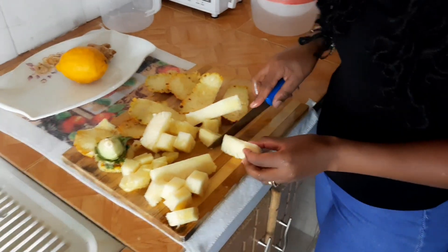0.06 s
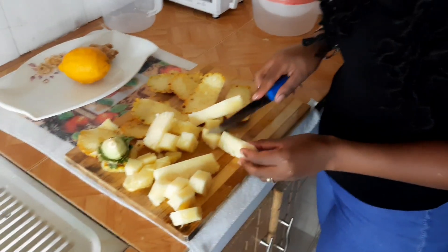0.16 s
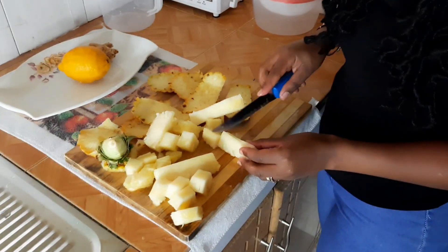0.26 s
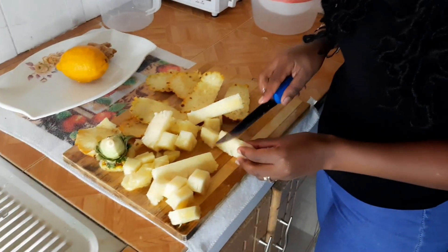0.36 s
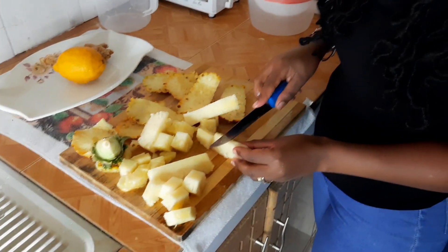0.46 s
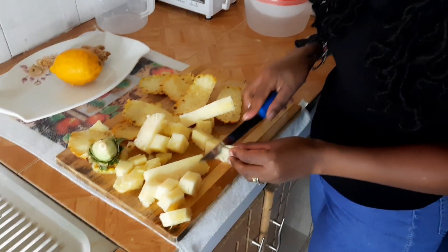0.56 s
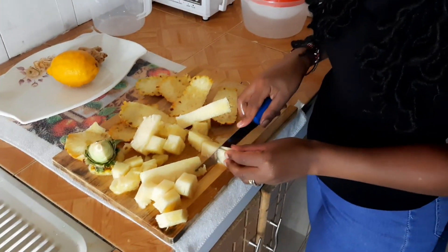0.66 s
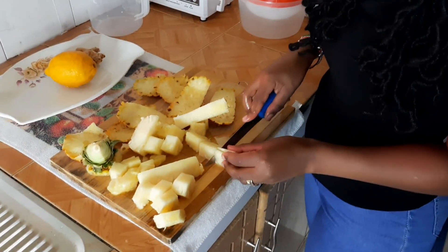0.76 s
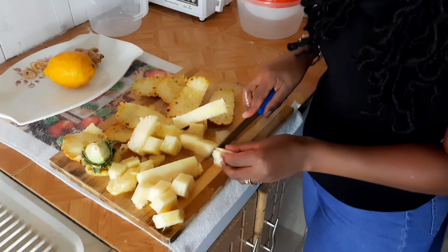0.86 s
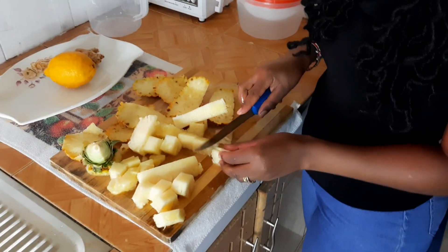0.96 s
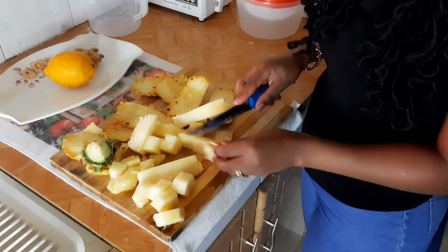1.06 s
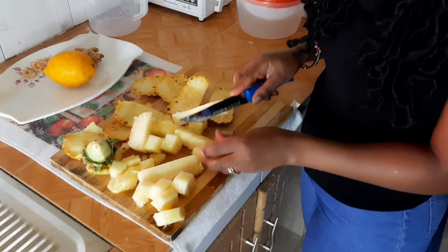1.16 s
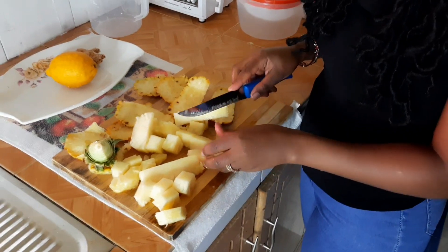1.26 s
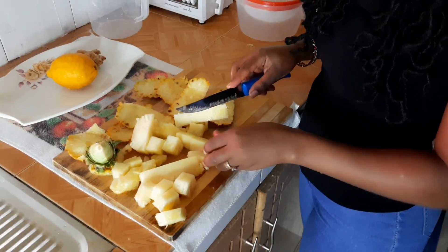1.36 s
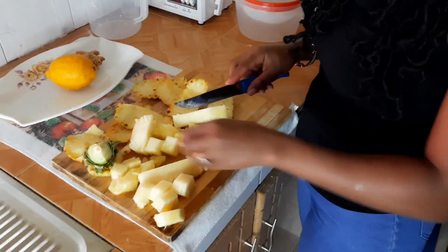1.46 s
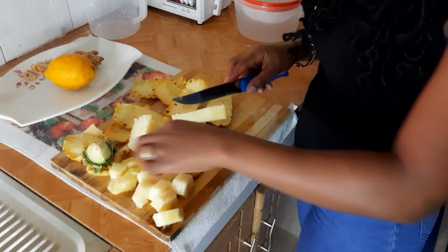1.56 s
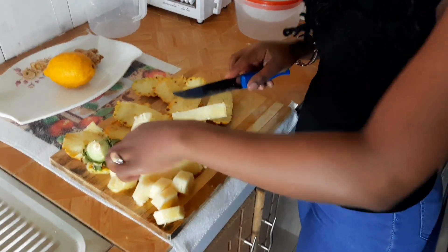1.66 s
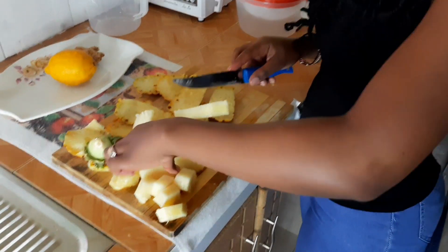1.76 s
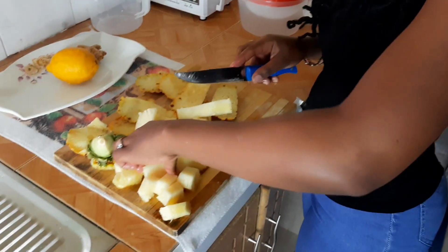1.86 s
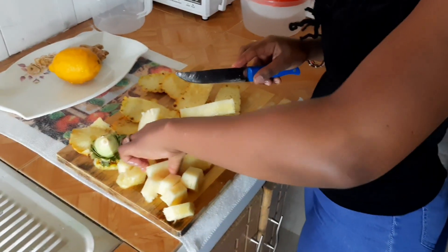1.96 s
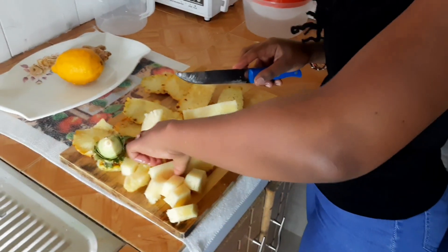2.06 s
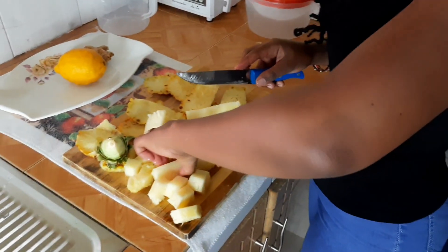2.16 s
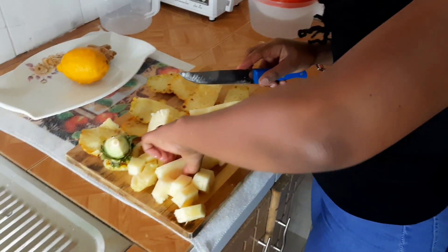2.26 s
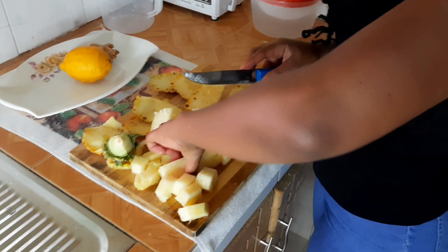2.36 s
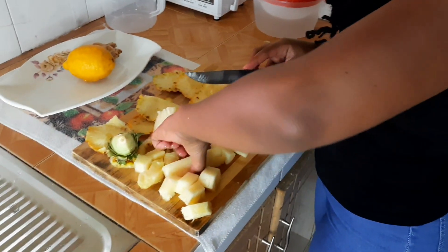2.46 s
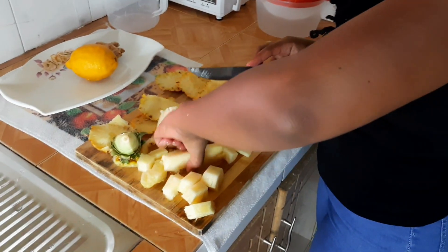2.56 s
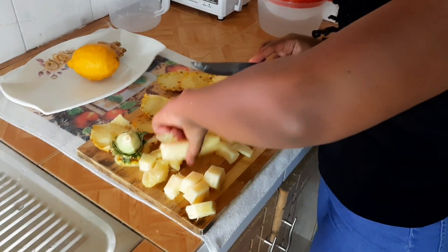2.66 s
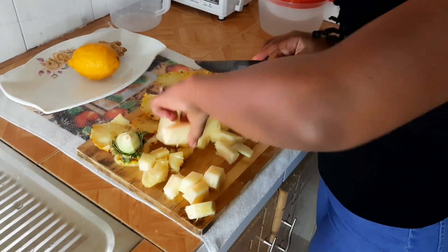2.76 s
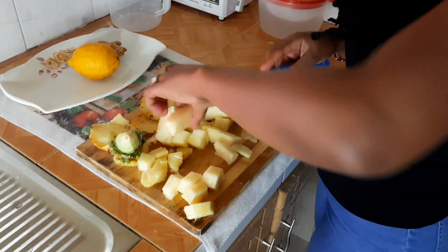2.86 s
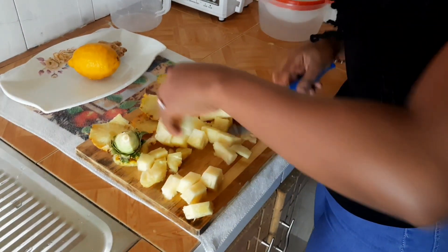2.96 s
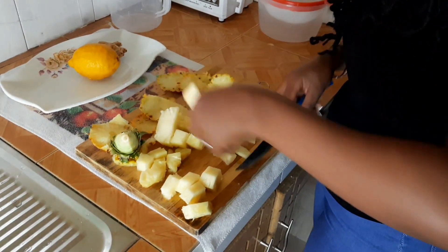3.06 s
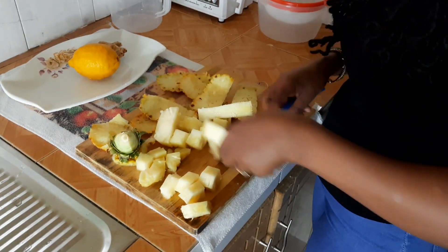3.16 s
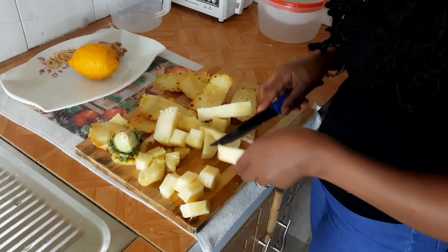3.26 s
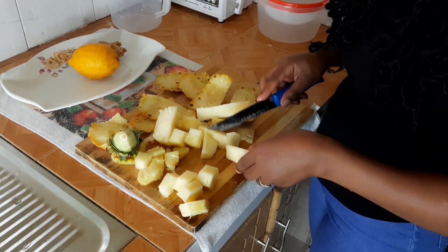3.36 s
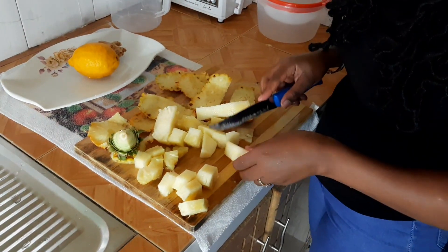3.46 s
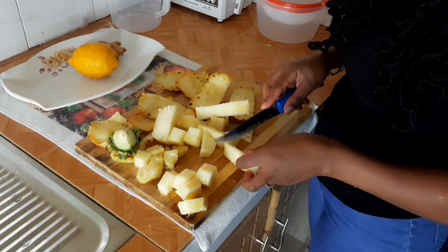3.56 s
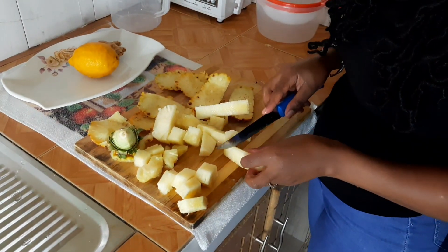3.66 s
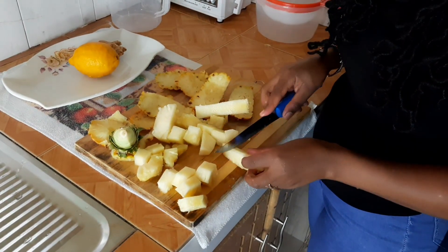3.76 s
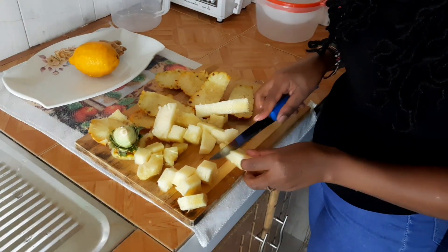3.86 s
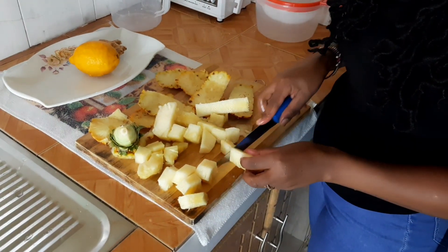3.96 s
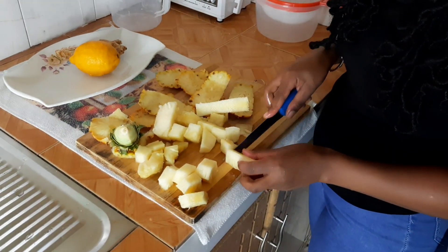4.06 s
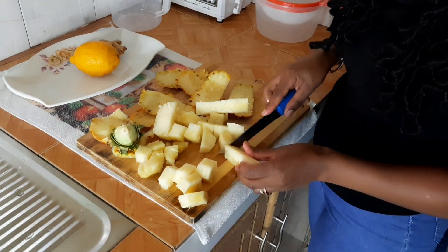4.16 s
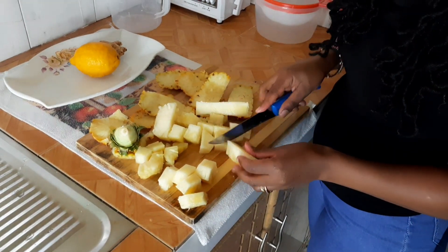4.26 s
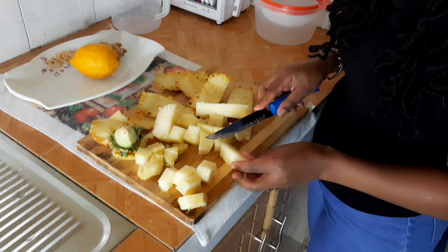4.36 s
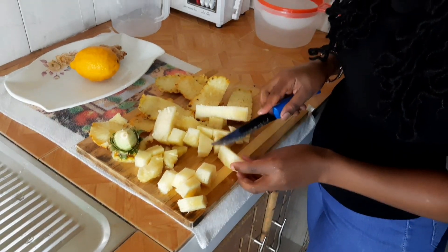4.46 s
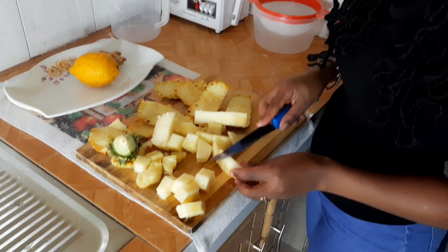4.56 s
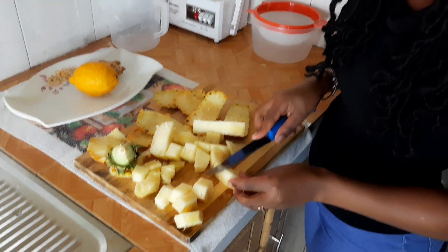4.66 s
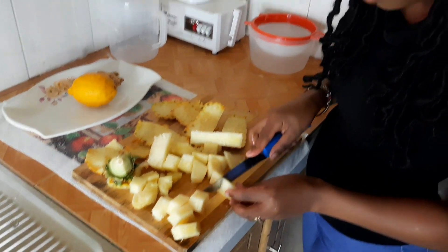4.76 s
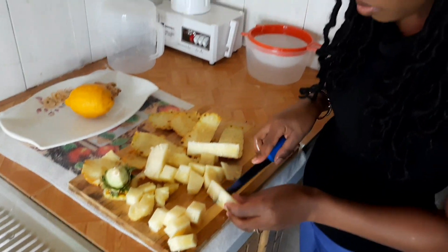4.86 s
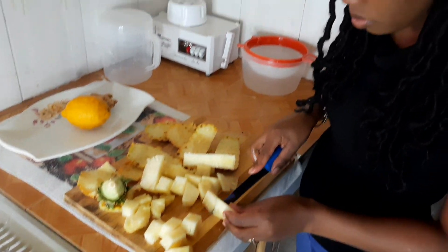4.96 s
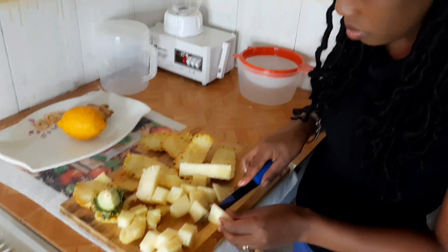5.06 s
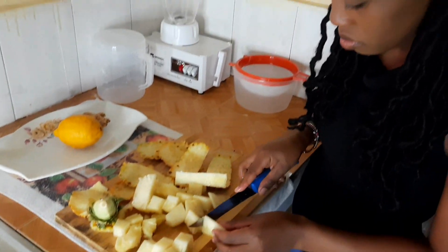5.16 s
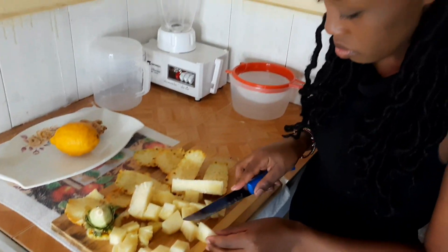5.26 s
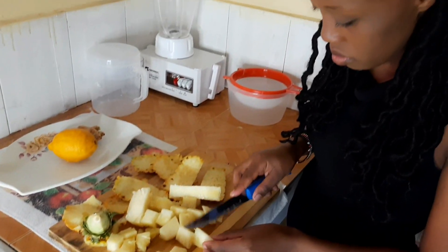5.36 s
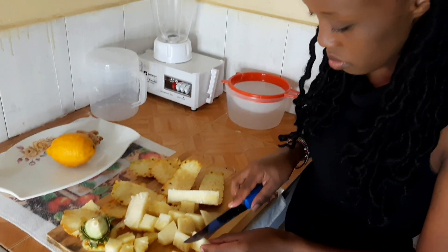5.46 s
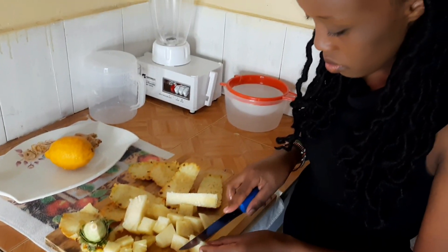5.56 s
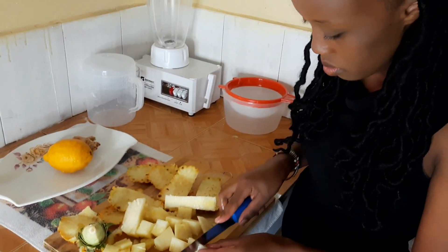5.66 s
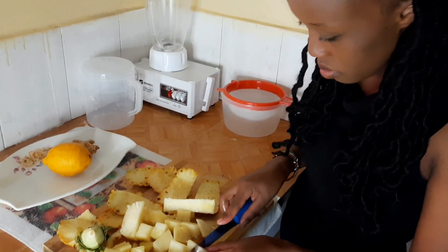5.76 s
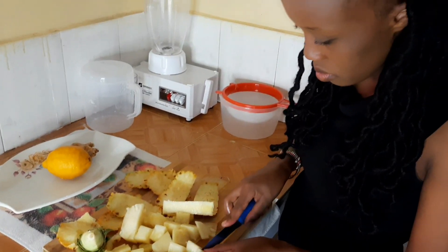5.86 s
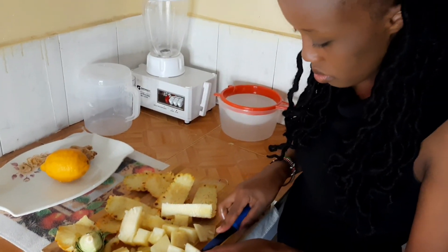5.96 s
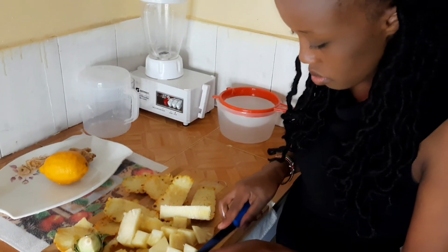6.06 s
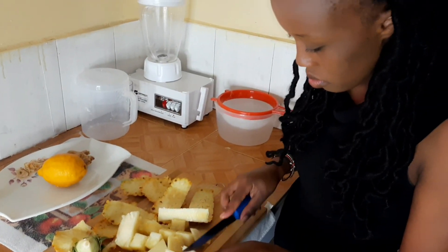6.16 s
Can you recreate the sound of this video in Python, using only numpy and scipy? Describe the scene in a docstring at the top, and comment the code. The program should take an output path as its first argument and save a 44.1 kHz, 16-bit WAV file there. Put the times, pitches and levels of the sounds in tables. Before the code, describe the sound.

A faint appliance hum and a light hiss run throughout in a small tiled kitchen with a short echo. At about 0.1 seconds a nearby knife crunches through wet pineapple and knocks firmly on a wooden board, then scrapes briefly and flicks free with a lighter tap. A softer chop follows at 1 second, and cut pieces slide and drop quietly. From about 1.8 to 2.9 seconds a hand gathers the fruit with a soft, juicy rustle and small squishes. Chopping resumes at 3.4, 4.2 and 5.2 seconds, each cut a moist crunch, a wooden knock and a short scrape, sitting slightly to the right. At about 4.7 seconds one short, dull bump hits the right side of the microphone. A little wet sliding leads into a last, sharp chop near 6.2 seconds, and the sound ends just as it lands.

```python
"""An appliance hums faintly in a small tiled kitchen. Two chops cut pineapple on a wooden board: the knife
bites in, crunches through wet fibres, knocks on the board and scrapes along it until it flicks free.
From about 2 s a hand gathers the pieces with a soft, juicy rustle. Four more chops follow from 3.4 s,
with one dull bump on the right at 4.7 s. The sound ends just as the last chop lands."""
import sys
import numpy as np
from scipy import signal
from scipy.fft import rfft, irfft, next_fast_len
from scipy.io import wavfile
from scipy.ndimage import uniform_filter1d

SR = 44100
rng = np.random.default_rng(int(sys.argv[2]) if len(sys.argv) > 2 else 0)


def to_wav(s):
    """Save 16-bit WAV."""
    ch = np.atleast_2d(s).T  # columns
    pcm = np.round(np.clip(ch, -1, 1) * 32767)  # PCM
    wavfile.write(sys.argv[1], SR, pcm.astype(np.int16))


N = 273949
TIME = np.arange(N) / SR
FFT_SIZE = next_fast_len(N, real=True)
HZ = np.maximum(np.fft.rfftfreq(FFT_SIZE, 1 / SR), 1)


def from_db(db):
    """Turn decibels into a number to multiply by."""
    return 10 ** (np.asarray(db) / 20)


def rms_one(x):
    """Scale a sound so its average strength (rms) is 1."""
    return x / np.sqrt(np.mean(x ** 2) + 1e-20)


def energy_one(x):
    """Scale each channel so its total energy is 1."""
    return x / np.sqrt(np.sum(x ** 2, axis=-1, keepdims=True) + 1e-20)


def at_hz(points, hz):
    """Read a table at any pitch, gliding between its rows."""
    pitches, values = np.transpose(points)
    return np.interp(np.log(hz), np.log(pitches), values)


def cut(x, order, hz, keep="low"):
    """Keep the lows, the highs or a band; a higher order cuts more sharply."""
    return signal.sosfilt(signal.butter(order, hz, keep, fs=SR, output="sos"), x)


def colour(x, spectrum):
    """Make some pitches stronger than others, as a table says; rms 1."""
    size = next_fast_len(x.shape[-1], real=True)
    hz = np.maximum(np.fft.rfftfreq(size, 1 / SR), 1)
    shaped = rfft(x, size) * from_db(at_hz(spectrum, hz))
    return rms_one(irfft(shaped, size)[..., :x.shape[-1]])


def even(sound, smooth_hz):
    """Even out a short sound so no broad range of pitches sticks out."""
    size = sound.shape[-1]
    spectrum = rfft(sound, 2 * size)
    power = np.mean(np.abs(np.atleast_2d(spectrum)) ** 2, axis=0)
    power = uniform_filter1d(power, max(int(smooth_hz * 2 * size / SR), 1))
    return irfft(spectrum / np.sqrt(power + 1e-12))[..., :size]


def stereo(mid, side, alike):
    """Mix two noises into left and right: alike 1 is the same, 0 unrelated, -1 opposite."""
    return np.sqrt(1 + alike) * mid + np.sqrt(1 - alike) * side * [[1], [-1]]


def drift(rate_hz):
    """A slow random wander; rms 1."""
    slow = rfft(rng.standard_normal(FFT_SIZE)) / (1 + (HZ / rate_hz) ** 2)
    return rms_one(irfft(slow, FFT_SIZE)[:N])


def strokes(rows):
    """Loudness that swells and dies away for each row of peak_s, rise_s, fall_s, level_db."""
    power = np.zeros(N)
    for peak_s, rise_s, fall_s, db in rows:
        near = slice(*np.searchsorted(TIME, [peak_s - 4 * rise_s, peak_s + 4 * fall_s]))
        t = TIME[near] - peak_s
        power[near] += from_db(db) ** 2 * np.exp(-2 * (t / np.where(t < 0, rise_s, fall_s)) ** 2)
    return np.sqrt(power)


def swells(rows):
    """Loudness of soft movements that rise and fall evenly."""
    return strokes([(s, length / 2, length / 2, db) for s, length, db in rows])


def grains(per_s, spread_db):
    """Tiny random clicks of uneven size."""
    sizes = from_db(spread_db * np.minimum(rng.exponential(1, N), 4))
    return (rng.random(N) < per_s / SR) * sizes * rng.choice([-1, 1], N)


# the room's low rumble and its hiss: pitch_hz, level_db
RUMBLE_TONE = [(15, -53.5), (25, -31.5), (39, -19.5), (59, -5), (91, -14), (172, -13.5), (183, -18),
               (204, 3), (227, -14.5), (273, -7), (361, -7.5), (448, -17.5), (515, -15.5), (583, -24.5),
               (1000, -34.5), (1300, -62), (2200, -120)]
HISS_TONE = [(590, -48), (1000, -8), (1420, -9), (1570, -5), (1710, -6.5), (2250, -10.5), (2840, -9),
             (3230, -6.5), (4300, -10), (5310, -4.5), (6860, -3), (7530, 1.5), (9720, -13), (14600, -6.5),
             (16000, -17.5)]
# how alike the room's noise is left and right: pitch_hz, alike (-1 to 1)
LIKENESS = [(60, 0.72), (130, 0.75), (290, 0.87), (640, 0.14), (1410, -0.61), (3100, 0.32), (6820, -0.19),
            (15000, 0.52)]

def room_noise(rumble_db=-58.5, hiss_db=-64.5):
    """A steady rumble and hiss, much the same on both sides in the bass."""
    out = 0
    for tone, db in (RUMBLE_TONE, rumble_db), (HISS_TONE, hiss_db):
        mid, side = rfft(rng.standard_normal((2, FFT_SIZE)))
        noise = irfft(stereo(mid, side, at_hz(LIKENESS, HZ)), FFT_SIZE)[:, :N]
        out = out + from_db(db) * colour(noise, tone)
    return out


# the tones of the motor: pitch_hz, level_db, unsteady_share (0 to 1)
MOTOR_TONES = [(67.3, -75, 0.97), (198.8, -61.5, 0.28), (321, -76.5, 0.63), (369, -72.5, 0.97),
               (1690, -87.5, 1.0)]

def appliance_hum(waver_hz=7):
    """A motor hums a few tones, each part steady and part wavering."""
    out = np.zeros(N)
    for hz, db, unsteady in MOTOR_TONES:
        waver = drift(waver_hz) + 1j * drift(waver_hz)  # shifts both level and phase
        swell = np.sqrt(2 * (1 - unsteady)) + np.sqrt(unsteady) * waver
        out += from_db(db) * np.real(swell * np.exp(2j * np.pi * hz * TIME))
    return out


# the direct sound, then echoes off nearby hard surfaces: delay_s, level_db, extra_right_delay_s
ECHOES = [(0, -6, .00015), (.0035, -4, .00018), (.0046, -6, -.0002), (.0087, -9, .0003),
          (.0157, -11, -.0002)]
# how long the kitchen rings until it is 60 dB quieter: pitch_hz, fade_s
ROOM_FADE = [(200, 0.65), (530, 0.49), (1400, 0.49), (3500, 0.48), (8000, 0.33), (16000, 0.67)]

def kitchen_echo(x, tail_db=1.5, build_s=0.0014, alike_below_hz=900, beam_hz=6000, beam_db=-2.5):
    """Sound arrives directly, slaps back off the tiles, then blurs into a fading tail."""
    t = np.arange(SR * 2 // 3) / SR
    early, tail = np.zeros((2, len(t))), 0
    for delay, db, lag in ECHOES:
        early[0, int(delay * SR)] += from_db(db)
        early[1, int((delay + lag) * SR)] += from_db(db)
    # the highest treble is beamed straight at the listener
    early += from_db(beam_db) * cut(1. * (t == 0) + 1e-18, 2, beam_hz, "high")
    edges = np.geomspace(120, 17000, 22)
    for low, high in zip(edges, edges[1:]):
        hz = np.sqrt(low * high)
        mid, side = cut(rng.standard_normal((2, len(t))), 2, [low, high], "band")
        blur = stereo(mid, side, alike=1 / (1 + (hz / alike_below_hz) ** 4))
        fade = (1 - np.exp(-t / build_s)) * from_db(-60 * t / at_hz(ROOM_FADE, hz))
        tail = tail + energy_one(blur * fade) * np.sqrt(2 * (high - low) / SR)
    response = energy_one(even(early + from_db(tail_db) * tail, smooth_hz=86))
    return signal.fftconvolve(x[None], response, axes=1)[:, :N]


# the balance between the two sides: pitch_hz, left_minus_right_db
BALANCE = [(200, 0.5), (400, -1), (1200, -1.5), (2400, -4.5), (4400, -4), (8000, -6.5), (15000, -1)]

def lean_right(x):
    """The right side faces the work, so it gets more treble."""
    size = next_fast_len(N + SR)
    hz = np.maximum(np.fft.rfftfreq(size, 1 / SR), 1)
    gains = from_db(at_hz(BALANCE, hz) * [[.5], [-.5]])
    return irfft(rfft(x, size) * gains, size)[:, :N]


def bump(start_s=4.6516, pitch_hz=400, width_hz=180, peak_db=-23.5):
    """One short, dull bump on the right microphone, with no echo."""
    push = 1. * (np.arange(N) == int(start_s * SR)) + 1e-18
    swing = cut(resonate(push, [(pitch_hz, width_hz, 0)]), 5, 1600)
    return from_db(peak_db) * swing / np.abs(swing).max() * [[0], [1]]


# the hand takes hold of pieces: peak_s, level_db, fade_db_per_s
GRABS = [(1.765, -56, 15.5), (2.6, -66.5, 84)]
# juicy pieces are squeezed: peak_s, length_s, level_db
SQUISHES = [(1.85, 0.057, -62), (2.38, 0.21, -70), (2.815, .06, -69), (5.725, 0.029, -63.5),
            (5.985, 0.049, -56)]
# the tone of the rustle and of the squish: pitch_hz, level_db
RUSTLE_TONE = [(700, -12), (1700, -3.5), (3300, -4.5), (4400, -1.5), (7200, 2.5), (9700, -5.5),
               (13000, 4.5), (16000, -1)]
SQUISH_TONE = [(1500, -42), (2500, -4), (3050, 2), (3900, -4), (5500, -7), (12000, -23)]

def hand_gathering(rise_s=0.023):
    """A hand rubs through the fruit and squeezes juice out between the pieces."""
    grip = 0
    for s, db, fade in GRABS:
        rise = np.exp(-(np.minimum(TIME - s, 0) / rise_s) ** 2)
        grip = grip + rise * from_db(db - fade * np.maximum(TIME - s, 0))
    rustle = grip * colour(grains(per_s=13000, spread_db=6.5), RUSTLE_TONE)
    squish = swells(SQUISHES) * colour(grains(per_s=5400, spread_db=25), SQUISH_TONE)
    return rustle + squish


# the way down through the fruit, a row per chop: bite_lead_s, bite_db, press_db, juice_spit_db
SLICES = [(.098, -55, -56.5, -44), (0.14, -54.5, -63, -68), (.1, -83, -81, -73), (0.029, -57, -63, -38),
          (0.18, -53, -56.5, -68), (0.208, -59.5, -55, -53)]
# the pull along the wood, a row per chop but the last:
# length_s, scrape_db, fibres_db, flick_scrape_db, flick_fibres_db, second_knock_db
DRAWS = [(.18, -43.5, -54, -49, -46, -44), (.146, -50.5, -55.5, -45, -55.5, -45.5),
         (.062, -39.5, -59, -39, -44.5, -57), (0.14, -50, -58, -62, -58, -55),
         (.143, -54, -62, -43, -52, -54.5)]

def knife_moves():
    """List each bite, press, pull and flick as peak_s, rise_s, fall_s, fibres_db, juice_db, wood_db."""
    moves = []
    for (s, *_), (lead_s, bite_db, press_db, _) in zip(CHOPS, SLICES):
        bite = (s - lead_s, .022, .026, bite_db, bite_db + 3, bite_db - 4)
        press = (s, .078, .008, press_db, press_db - .5, press_db - 4)
        moves += [bite, press]
    for (s, *_), (length, scrape_db, fibres_db, flick_db, tear_db, _) in zip(CHOPS, DRAWS):
        pull = (s + .24 * length, .13 * length, .61 * length, fibres_db, fibres_db - 3.5, scrape_db)
        flick = (s + length, .023, .015, tear_db, tear_db - 5.5, flick_db)
        moves += [pull, flick]
    return moves


def knife_scraping(board_db=-10):
    """The edge sticks and slips on the wood, shaking board and blade."""
    slips = grains(per_s=3000, spread_db=5.5)
    effort = strokes([(*timing, db) for *timing, _, _, db in knife_moves()])
    wood = from_db(board_db) * rms_one(resonate(slips, BOARD_NOTES))
    return effort * rms_one(colour(slips, CLACK_TONE) + wood)


# single fibres snap: peak_s, level_db
SNAPS = [(0.046, -47.5), (2.338, -57), (2.779, -55.5), (3.533, -44.5), (3.735, -54), (5.162, -51),
         (6.069, -51)]
# wet pieces slide off the blade or over each other: peak_s, length_s, juice_db
SLIDES = [(.48, 0.084, -61.5), (1.27, 0.15, -62), (1.47, 0.12, -64), (4.56, 0.06, -70), (5.905, .04, -57.5)]
# the tone of crunching fibres and of fizzing juice: pitch_hz, level_db
CRUNCH_TONE = [(500, -5.5), (1500, -14), (3000, -1.5), (4300, -3.5), (7500, -5), (9500, -19), (16000, -27)]
FIZZ_TONE = [(3000, -38), (7500, 1.5), (9700, -9.5), (12500, -0.5), (16000, -2.5)]

def fruit_crunching(slide_fibres_db=-3.5, snap_juice_db=-3.5):
    """Fibres snap in a dense crunch as the edge passes, and their juice fizzes higher up."""
    moves, slides = knife_moves(), swells(SLIDES)
    snaps = strokes([(s, .0012, .005, db) for s, db in SNAPS])
    spits = strokes([(s, .0004, .0014, db) for (s, *_), (*_, db) in zip(CHOPS, SLICES)])
    fibres = strokes([(*timing, db) for *timing, db, _, _ in moves])
    fibres += snaps + from_db(slide_fibres_db) * slides
    juice = strokes([(*timing, db) for *timing, _, db, _ in moves])
    juice += from_db(snap_juice_db) * snaps + slides + spits
    crunch = fibres * colour(grains(per_s=1700, spread_db=5.5), CRUNCH_TONE)
    fizz = juice * colour(grains(per_s=4600, spread_db=3.5), FIZZ_TONE)
    return crunch + fizz


def resonate(x, notes):
    """Let a sound set several notes ringing; narrower notes ring longer."""
    out = 0
    for hz, width_hz, db in notes:
        decay = np.exp(-np.pi * width_hz / SR)
        poles = [1, -2 * decay * np.cos(2 * np.pi * hz / SR), decay ** 2]
        out = out + from_db(db) * (1 - decay ** 2) / 2 * signal.lfilter([1, 0, -1], poles, x)
    return out


def crack(t, fade_s, tone):
    """Many crowded notes struck at once, dying by 60 dB in fade_s; energy 1."""
    burst = even(rng.standard_normal(len(t)) * from_db(-60 * t / fade_s), smooth_hz=50)
    return energy_one(colour(np.pad(burst, (0, len(t))), tone)[:len(t)])


# a cut piece drops on the board: start_s, board_db, clack_db
DROPS = [(.465, -58, -61), (1.304, -55.5, -81)]
# the knife lands, a row per chop:
# start_s, board_db, spot_pitch_hz, clack_db, clack_tilt_db_per_octave, clack_top_hz, tick_db
CHOPS = [(0.1174, -29, 547, -22.5, 2, 3280, -43), (1.0191, -40.5, 600, -46, -7, 3060, -58),
         (3.3925, -35.5, 830, -38, -0.5, 4400, -54.5), (4.249, -34.5, 338, -28, -6, 3530, -37.5),
         (5.206, -38, 315, -33.5, -5, 2800, -56), (6.1686, -29.5, 317, -19, -1, 4300, -33.5)]

def blows():
    """List each landing, a lighter knock as the pull ends, and the drops, all in the columns of CHOPS."""
    second_knocks = [(s + length - .005, db, spot_hz, db - 2.5, 5, 4100, db - 10)
                     for (s, _, spot_hz, *_), (length, *_, db) in zip(CHOPS, DRAWS)]
    drops = [(s, db, 300, clack_db, 7, 2800, -86) for s, db, clack_db in DROPS]
    return list(CHOPS) + second_knocks + drops


# the low notes of the board on the counter: pitch_hz, width_hz, level_db
BOARD_NOTES = [(258, 4.4, -18), (320.4, 30, 8.5), (379, 79, 3.5), (425.5, 11, -4), (484, 33, -3),
               (529, 49, 3), (600, 36, -3.5), (656, 46, -3.5), (726, 24, -15.5), (765, 25, -5.5),
               (774, 32, -8.5), (788, 33, -14.5), (922, 43, 0.5), (1252, 57, -6.5), (1180, 56, -4)]
# the clack (crowded upper notes of board and blade) and the tick of the edge: pitch_hz, level_db
CLACK_TONE = [(150, -40.5), (400, -19), (800, -6), (1000, -2), (1400, -3), (1900, 3), (2250, -3),
              (2750, -1.5), (3300, -11.5), (3750, -7), (4150, -42.5), (9000, -55.5)]
TICK_TONE = [(1500, -20), (3000, 5.5), (3800, -3), (4500, -2), (7000, -5.5), (9500, -22), (13000, -24.5),
             (16000, -25.5)]

def board_knocks(focus_db_per_octave=12, vary_db=0.5, level_span_s=0.038):
    """Each blow rings the low notes of the board, with a clack and a tick of the edge."""
    out, t = np.zeros(N), np.arange(SR // 3) / SR
    push = cut(1. * (t == 0), 2, 1610)
    for s, board_db, spot_hz, clack_db, tilt, top_hz, tick_db in blows():
        # the spot that is hit favours the notes near one pitch
        notes = [(hz, width, db - focus_db_per_octave * abs(np.log2(hz / spot_hz)) + vary_db * rng.normal())
                 for hz, width, db in BOARD_NOTES]
        wood = energy_one(resonate(push, notes))
        # fruit under the edge cushions the blow and dulls the clack
        tilted = [(hz, db + tilt * np.log2(hz)) for hz, db in CLACK_TONE]
        clack = cut(crack(t, fade_s=.024, tone=tilted), 6, top_hz)
        tick = crack(t, fade_s=.011, tone=TICK_TONE)
        blow = from_db(board_db) * wood + from_db(clack_db) * clack + from_db(tick_db) * tick
        start = round(s * SR)
        out[start:start + len(t)] += blow[:N - start] * np.sqrt(level_span_s * SR)
    return out


def scene():
    """Knife and hand work in the echoing kitchen, over its quiet background."""
    work = board_knocks() + knife_scraping() + fruit_crunching() + hand_gathering()
    work = cut(work, 2, 185, "high")  # a small board gives off no deep bass
    return lean_right(kitchen_echo(work) + room_noise() + appliance_hum()) + bump()


def record(dry):
    """Cut away the very highest treble, above 15900 Hz."""
    return signal.sosfilt(signal.ellip(10, .1, 80, 15900, fs=SR, output="sos"), dry)


dry = scene()
out = record(dry)
to_wav(out)
```